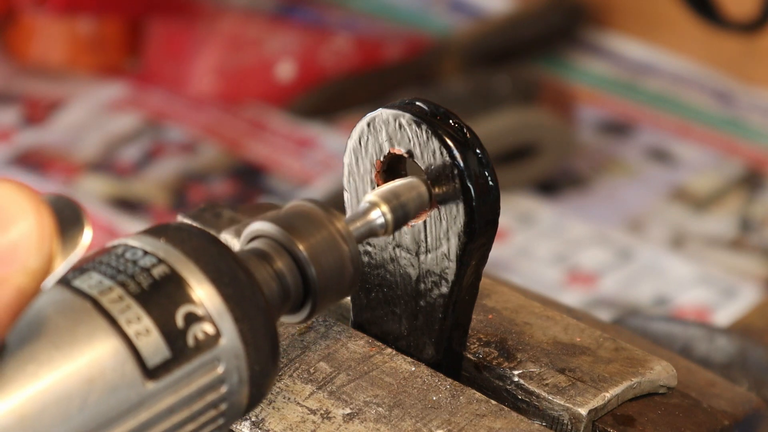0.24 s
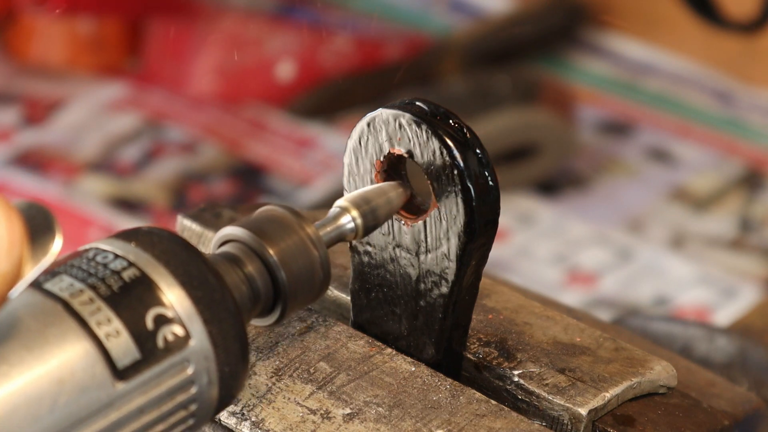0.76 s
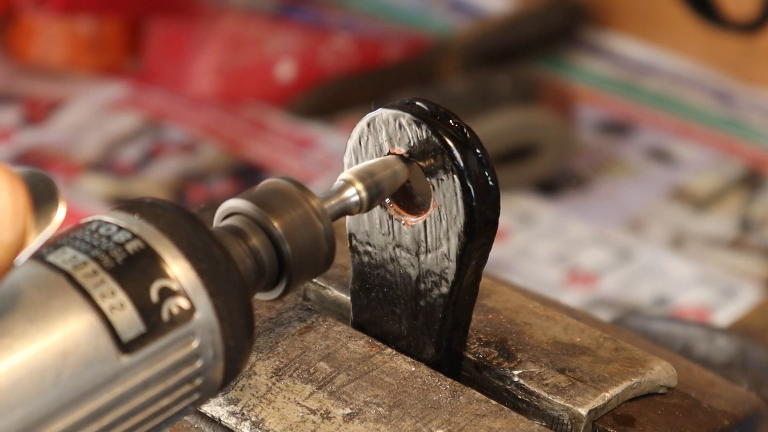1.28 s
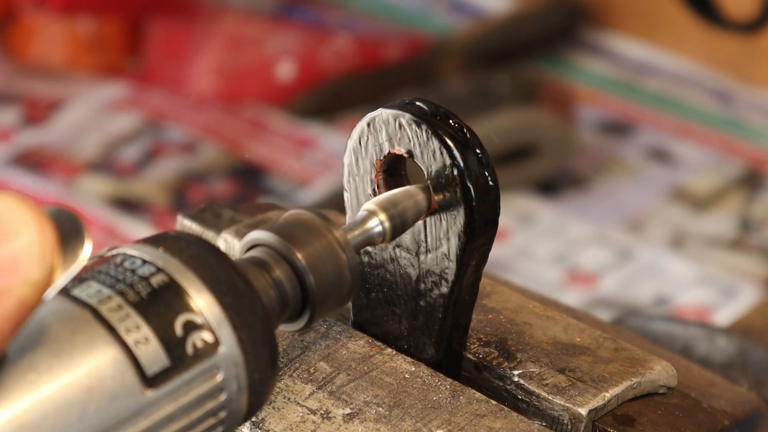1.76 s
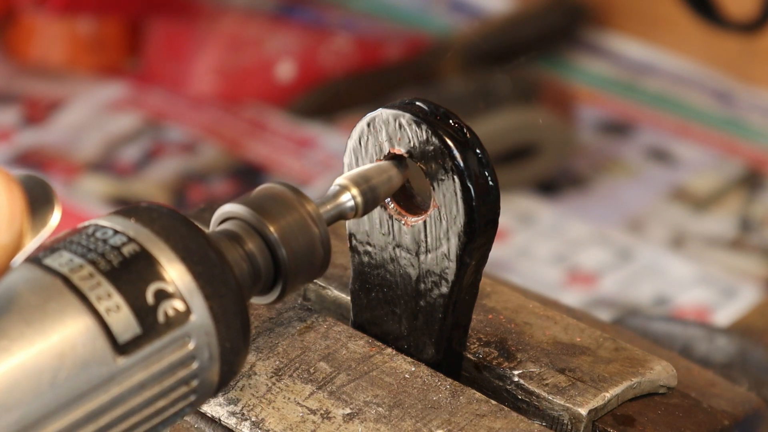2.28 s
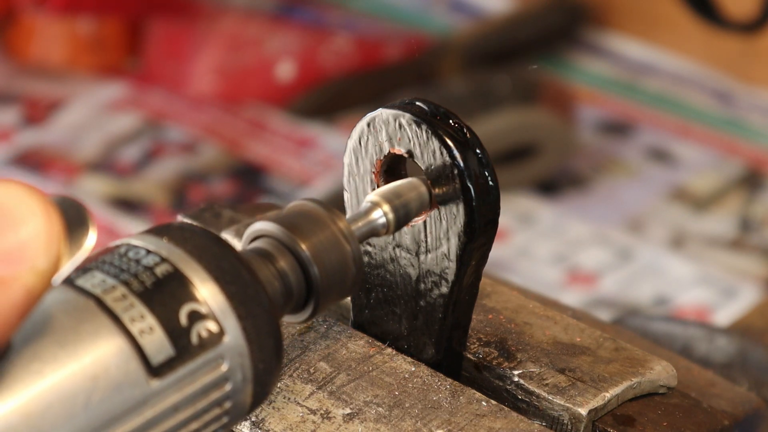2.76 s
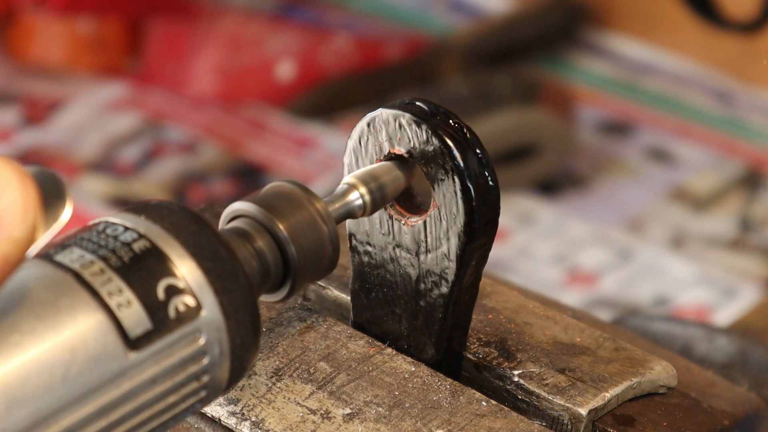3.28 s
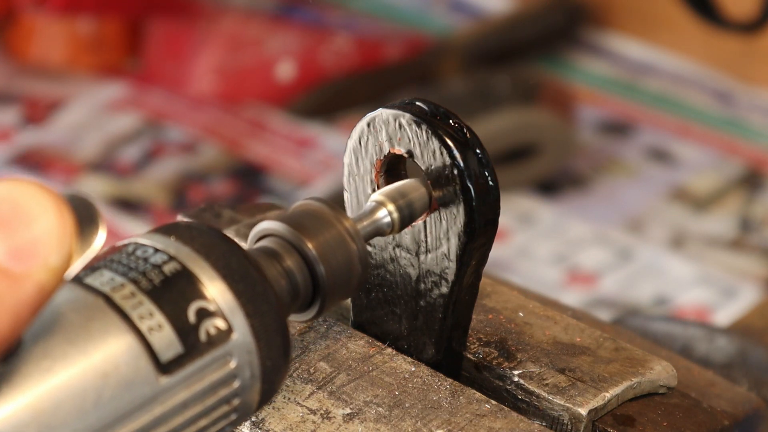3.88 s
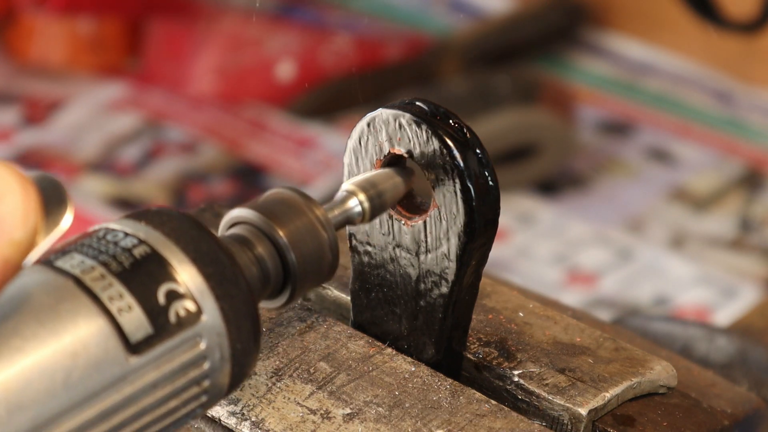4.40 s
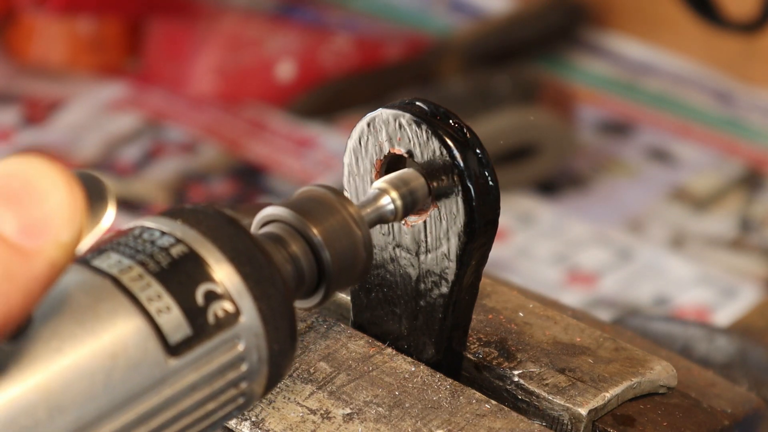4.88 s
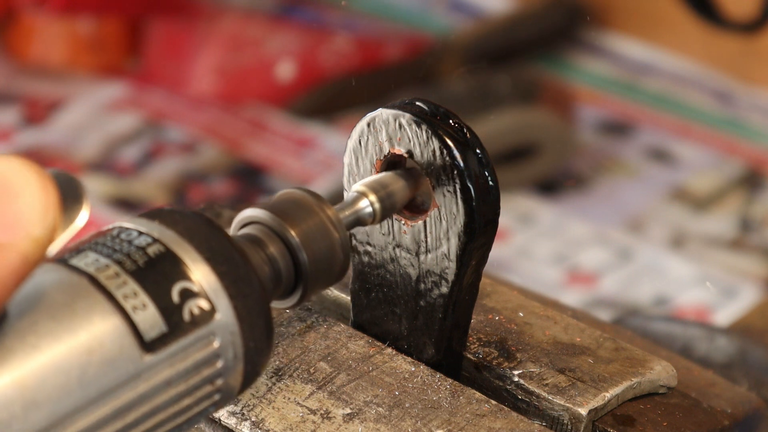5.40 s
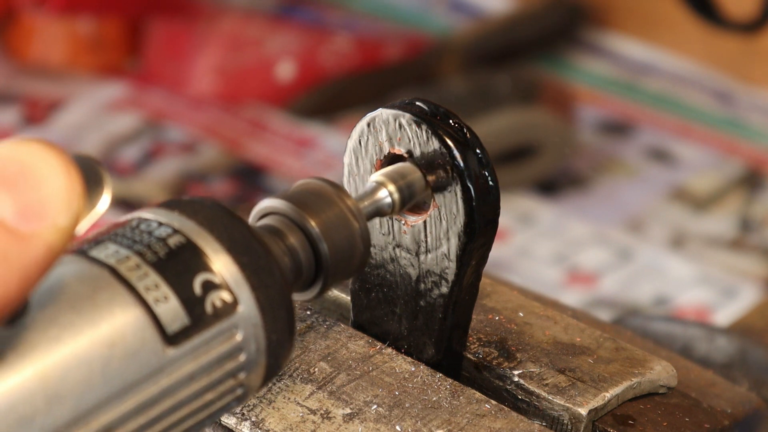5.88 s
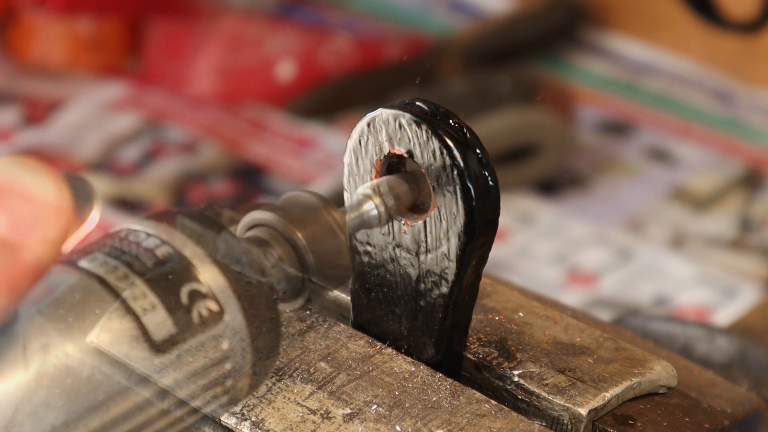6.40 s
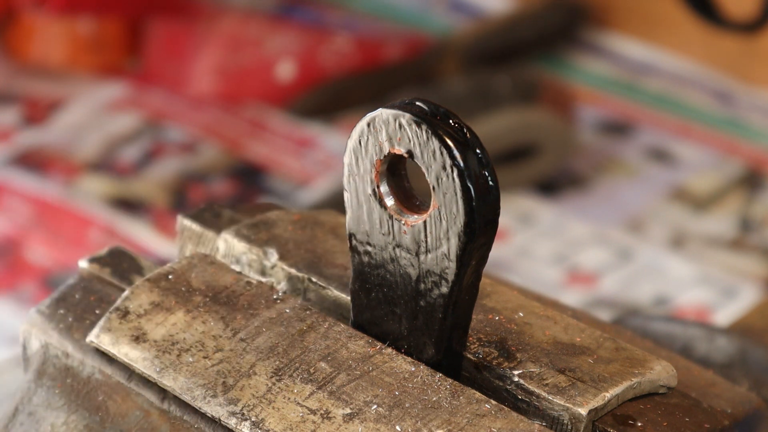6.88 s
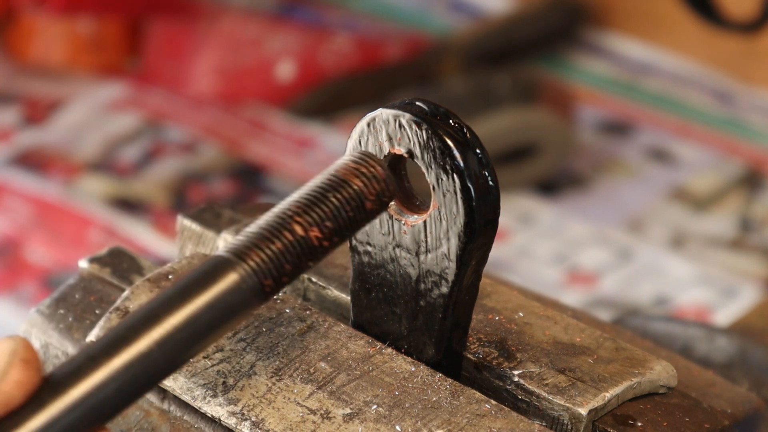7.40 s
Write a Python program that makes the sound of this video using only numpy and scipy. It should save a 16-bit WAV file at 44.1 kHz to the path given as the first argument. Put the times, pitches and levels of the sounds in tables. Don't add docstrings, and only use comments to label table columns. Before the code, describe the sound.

Close, dry workshop sound: an air-driven die grinder already at speed, with a reedy mid-pitched whine, bright hissing exhaust and a fast rattling edge. Short grating bites into a ringing steel piece alternate with rising, louder revs, the strongest about three and five seconds in. It softens slightly, then spins down in a fraction of a second, leaving only very quiet low room tone.

```python
import sys
import numpy as np
from scipy import signal
from scipy.fft import rfft, irfft
from scipy.io import wavfile
from scipy.ndimage import uniform_filter1d

SR = 44100
rng = np.random.default_rng(int(sys.argv[2]) if len(sys.argv) > 2 else 0)


def level_to_linear(level):
    exponent = np.asarray(level, float) / 20
    return 10 ** exponent


def transcribe(signal):
    frames = np.atleast_2d(signal).T
    limited = np.clip(frames, -1, 1)
    pcm = np.round(limited * 32767).astype(np.int16)
    wavfile.write(sys.argv[1], SR, pcm)


N = 337365
VANES = 4
RELEASE_S = 6.753


def level(x, db):
    return x * level_to_linear(db) / np.sqrt(np.mean(x ** 2))


def curves(table):
    s, *columns = np.transpose(table)
    return [np.interp(np.arange(N) / SR, s, c) for c in columns]


def shape_db(points, hz):
    f, db = np.transpose(points)
    return np.interp(np.log(np.maximum(hz, 1)), np.log(f), db, left=-80, right=-80)


def coloured(x, points):
    gain = level_to_linear(shape_db(points, np.fft.rfftfreq(N, 1 / SR)))
    return irfft(rfft(x) * gain, N)


def ring(x, modes):
    return sum(level_to_linear(db) * signal.lfilter(*signal.iirpeak(hz, hz / width, fs=SR), x)
               for hz, width, db in modes)


def walk(rate_hz):
    k = int(SR / rate_hz)
    held = np.repeat(rng.standard_normal(N // k + 1), k)
    return 1.3 * uniform_filter1d(uniform_filter1d(held, k), k)[:N]


def tail(x, t60_s):
    t = np.arange(SR // 2) / SR
    echo = rng.standard_normal(len(t)) * np.exp(-np.log(1000) * t / t60_s)
    return signal.fftconvolve(x, echo / np.sqrt(np.sum(echo ** 2)))[:N]


# t/s, f/Hz
LOADED_SPEED = [(0, 510), (.45, 491), (1.5, 488.5), (2.6, 480.7), (3.5, 473.6), (3.9, 484), (4.8, 482.6),
                (5.1, 485.2), (5.8, 465.4), (6.75, 481)]
# t of top speed/s, gain/Hz, run-up/s, sag/s
LIFTS = [(.932, 64.6, 0.58, 0.59), (1.856, 22.9, .642, 0.1), (2.02, 105.6, 0.17, 0.59),
         (2.171, 35, 0.52, 0.17), (2.969, 33.2, .265, .093), (3.137, 218.6, 0.29, 0.26),
         (3.352, 58.3, .151, 0.16), (4.038, 21.8, 0.24, 0.16), (4.249, 93.3, 0.36, 0.41),
         (4.538, 30, .163, 0.2), (5.158, 57.4, 0.12, .148), (5.31, 262.5, .24, 0.27),
         (5.53, 18.4, .09, .17), (6.515, 37.2, .3, 0.2)]


def speed():
    coast_s, coast_end_hz = .06, 150
    t = np.arange(N) / SR
    hz, = curves(LOADED_SPEED)
    for top_s, gain_hz, rise_s, sag_s in LIFTS:
        away = (t - top_s) / np.where(t < top_s, rise_s, sag_s)
        hz = hz + gain_hz * np.cos(np.pi / 2 * np.clip(away, -1, 1)) ** 2
    return coast_end_hz + (hz - coast_end_hz) * np.exp(-np.maximum(t - RELEASE_S, 0) / coast_s)


# f/Hz, level/dB
BENCH_PATH = [(190, -36.5), (470, -24.5), (600, -21), (740, -25.5), (1000, -16), (1370, -21), (1500, -29),
              (2200, -20)]
# f/Hz, half width/Hz, depth/dB
NULLS = [(338, 6.7, -9), (528, 15.3, -16), (679, 13.5, -16.5), (920, 15, -15.5), (963.5, 16, -14.5),
         (1026, 40.7, -15.5), (1147.6, 53, -16), (1267, 25, -12), (1578, 7, -14.5), (1735, 22, -6.5),
         (1876, 10, -13.5), (2042, 78, -20)]


def path_db(hz):
    nulls_db = sum(db / (1 + ((hz - at) / width) ** 2) for at, width, db in NULLS)
    return shape_db(BENCH_PATH, np.clip(hz, 200, 2150)) + nulls_db


def vane_levels_db(hz, tool_db, surge, running):
    third_db, surge_db, coast_db_per_s = -9.5, 2.5, -83
    drive_db = tool_db + surge_db * surge + coast_db_per_s * np.cumsum(~running) / SR
    tones_db = [path_db(k * hz) + drive_db for k in range(1, 4)]
    tones_db[2] = tones_db[2] + third_db
    return tones_db


def tone(phase, multiple):
    lag = .37 * multiple * (multiple - 1)
    return -np.sqrt(2) * np.cos(2 * np.pi * multiple * phase - lag)


# multiple of vane rate, level over quarter multiples/dB
OVERTONES = [(4, 19), (5, 14.5), (6, 15), (6.25, 8), (6.75, 8), (7, 19), (8, 13), (8.25, 8), (9, 16),
             (10, 11.5), (11, 14.5), (12, 14), (13, 7), (14, 9), (15, 9), (16, 8), (17, 8), (18, 9),
             (19, 8), (20, 8), (20.5, 7), (21, 11), (22, 6), (23, 6), (5.25, 10), (5.5, 8)]


def turn_shape(phase):
    multiple = np.arange(2049) / VANES
    chance = rng.random((len(multiple), 2))
    db = np.resize([-1.0, 2.0, -3.0, 3.0], len(multiple)) + 5 * (chance[:, 0] - .5)
    for k, over_db in OVERTONES:
        db[int(round(k * VANES))] = over_db
    band = (multiple > 3) * (multiple < 30)
    lines = level_to_linear(db) * np.exp(2j * np.pi * chance[:, 1]) * band
    return np.interp(phase / VANES % 1, np.arange(4096) / 4096, irfft(lines), period=1)


# multiple of vane rate, level/dB
UNEVEN = [(.5, -67), (.75, -59), (1.25, -57), (1.5, -60), (1.75, -57), (2.25, -60), (2.5, -62), (2.75, -56)]
# f/Hz, level/dB
BENCH = [(150, 1), (480, -1), (530, -6.5), (610, 3.5), (680, -15.5), (760, -10), (880, 2), (960, 2.5),
         (1150, -14), (1350, -3.5), (2200, -12)]
# f/Hz, level/dB
BODY = [(1500, -20), (2000, -17), (2300, -7.5), (2730, 2), (3200, -5), (3700, -18), (4250, -6), (4500, -10),
        (5000, -3), (5300, -7), (5800, -2), (6500, -12), (7300, -11), (8800, -25)]
# f/Hz, level/dB per Hz
JET = [(8000, -38), (10200, -13.5), (11100, 2.5), (11800, -1), (13000, -3), (14500, -11.5), (16000, -10.5)]


def rotor(phase, tones_db, upper_db, flow_db, shake_db):
    vanes = sum(level_to_linear(db + .8 * walk(60)) * tone(phase, k + 1) for k, db in enumerate(tones_db))
    uneven = sum(level_to_linear(db + 3 * walk(6)) * tone(phase, k) for k, db in UNEVEN)
    shape = turn_shape(phase) * level_to_linear(0.64 * walk(90))
    upper = level_to_linear(upper_db) * level(coloured(shape, BODY), -1.2)
    upper = upper + level_to_linear(flow_db) * level(coloured(shape, JET), -7)
    upper = upper + level_to_linear(-9) * tail(upper, .06)
    shake = level_to_linear(shake_db - 1.0) * tone(phase, 1 / VANES)
    return vanes + shake + upper + coloured(uneven, BENCH)


# f/Hz, level/dB per Hz
EXHAUST = [(25, -30.5), (85, -10.5), (200, -20), (450, -7), (1000, -13), (1500, -3), (2100, -15.5),
           (3300, -5.5), (4500, -2.5), (6000, -25.5), (6800, -9.5), (8500, -22.5), (10000, -14.5)]
# f/Hz, width/Hz, level/dB
HOUSING = [(2696, 190, 5.5), (2480, 310, -7.5), (4600, 450, -21), (5750, 280, -14)]


def exhaust(phase, flow_db, octaves):
    knock_db, knock_body_db, knock_flutter_db, rattle_db_per_oct = -2.5, -7, 5, 6.5
    puff = 1 + 0.48 * np.sin(2 * np.pi * phase) + .15 * np.sin(2 * np.pi * phase / VANES)
    noise = [puff * level_to_linear(flutter_db * walk(45)) * rng.standard_normal(N)
             for flutter_db in (1.1, 1.1, 4, .8)]
    hiss = level(coloured(noise[0], EXHAUST), -0.071) + level(coloured(noise[1], BODY), -2.0)
    knock = np.diff(np.floor(phase / VANES), prepend=0) * level_to_linear(knock_flutter_db * walk(70))
    rattle = level(ring(noise[2], HOUSING), -2.5) + level(ring(knock, HOUSING), knock_db)
    casing = level(tail(coloured(knock, BODY), 0.029), knock_body_db)
    whistle = level(coloured(noise[3], JET), -3.5)
    return level_to_linear(flow_db) * (hiss + casing + level_to_linear(rattle_db_per_oct * octaves) * rattle + whistle)


# t/s, length/s, bite level/dB, once-a-turn shake level/dB
PASSES = [(.12, .25, -52.5, -63), (.83, .32, -53, -59.5), (1.4, 0.39, -44, -56), (2.53, .36, -41.5, -55),
          (3.1, .17, -45.5, -63), (3.56, .37, -42, -59.5), (4.38, 0.19, -50.5, -60), (4.74, .4, -39.5, -54),
          (5.53, .17, -39, -58), (5.87, 0.27, -38.5, -62), (6.22, 0.41, -46, -58)]


def passes(column, rest_db):
    edge_s = .09
    t = np.arange(N) / SR
    db = rest_db
    for row in PASSES:
        inside_s = np.minimum(t - row[0], row[0] + row[1] - t)
        db = db + (row[column] - rest_db) * np.clip(inside_s / edge_s + 1, 0, 1)
    return db


# f/Hz, width/Hz, level/dB
LUG = [(1763, 410, 6.5), (2235, 270, 5.5), (1250, 330, -22.5)]


def burr(phase, bite_db):
    chips = rng.standard_normal(N) * level_to_linear(2.2 * rng.exponential(size=N))
    knock = np.sin(np.pi * phase / VANES) ** 40 * np.sin(2 * np.pi * 3.5 * phase)
    knock = knock * level_to_linear(3 * walk(120))
    bursts = level_to_linear(bite_db + 2.2 * walk(45))
    return bursts * level(ring(level(chips, 0) + level(knock, -13.5), LUG), 0)


# f/Hz, level/dB per Hz
ROOM = [(12, -41), (20, -11), (43, -1.5), (70, -6.5), (98, -2.5), (412, -16), (926, 0), (1310, -9.5),
        (1540, -16.5), (2740, -33), (5000, -34), (6500, -69.5), (11000, -120)]


def room():
    return level(coloured(rng.standard_normal(N), ROOM), -74) * level_to_linear(1.5 * walk(2.2))


# t/s, level/dB
TOOL_LEVEL = [(0, -.3), (.45, 0.5), (1.5, 0.33), (2.7, 0.47), (3.6, -0.5), (4.9, 1.43), (5.7, -0.6), (6.2, -1),
              (6.5, -4), (6.75, -7), (6.8, -13)]
# t/s, level/dB
FADE = [
    (6.79, 0),
    (6.82, -4.5),
    (6.86, -32),
    (6.92, -34),
    (7.0, -46),
    (7.1, -80),
]


def scene():
    hz, tool_db = speed(), curves(TOOL_LEVEL)[0]
    running = np.arange(N) / SR < RELEASE_S
    surge = np.tanh(np.gradient(hz) * SR / 750) * running
    octaves = np.log2(hz / 480)
    tones_db = vane_levels_db(hz, tool_db, surge, running)
    flow_db = -42.5 + 2.3 * octaves + .8 * surge + 1.19 * tool_db + 0.44 * walk(5.4)
    upper_db = -38 + 12.5 * octaves + 2.5 * surge + tool_db + 1.1 * walk(8)
    jitter = 1 + 0.001003 * walk(30)
    phase = np.cumsum(uniform_filter1d(hz, size=400) * jitter) / SR
    tool = rotor(phase, tones_db, upper_db, flow_db, passes(column=3, rest_db=-67.5))
    tool = tool + exhaust(phase, flow_db, octaves)
    tool = tool + burr(phase, passes(column=2, rest_db=-50))
    echo = level_to_linear(-12) * tail(tool, .35)
    return ((tool + echo) * level_to_linear(curves(FADE)[0]) + room())[None]


# t/s, share of weak bands lost
GAPS = [(.129, .8), (.79, .8), (2.444, 1.25), (2.838, .85), (2.987, .85), (3.541, .85), (5.163, .85),
        (5.357, .85), (5.568, .8), (5.826, .85)]


def weak_band_gaps(dry):
    t = np.arange(N) / SR
    hole = sum(share * np.clip(1.9 - abs(t - s) / .01, 0, 1) for s, share in GAPS)
    weak = coloured(dry[0], [(1800, -30), (2100, -7), (2700, -12), (3600, -5), (6300, -4), (7500, -2),
                             (10300, -2), (11000, -5), (12800, -4), (13600, -2), (17000, -2)])
    return dry - hole * weak


def top_cut(x):
    return signal.sosfilt(signal.butter(12, 16770, fs=SR, output="sos"), x)


def record(dry):
    top = signal.ellip(12, .1, 70, 15720, fs=SR, output="sos")
    mix = signal.sosfilt(top, weak_band_gaps(dry))
    return top_cut(mix)


dry = scene()
out = record(dry)
transcribe(out)
```